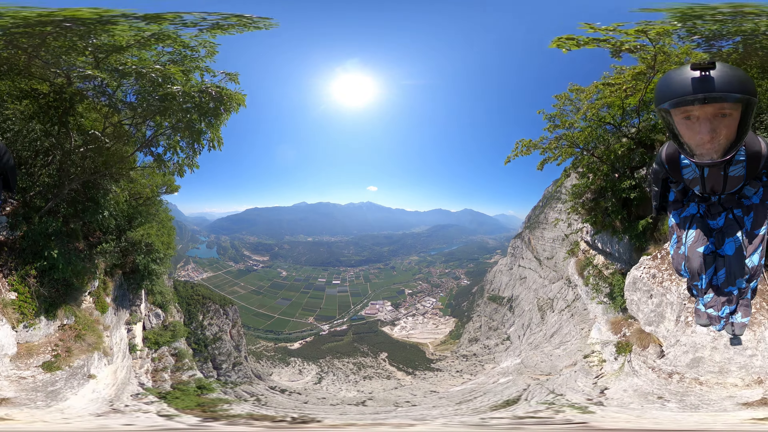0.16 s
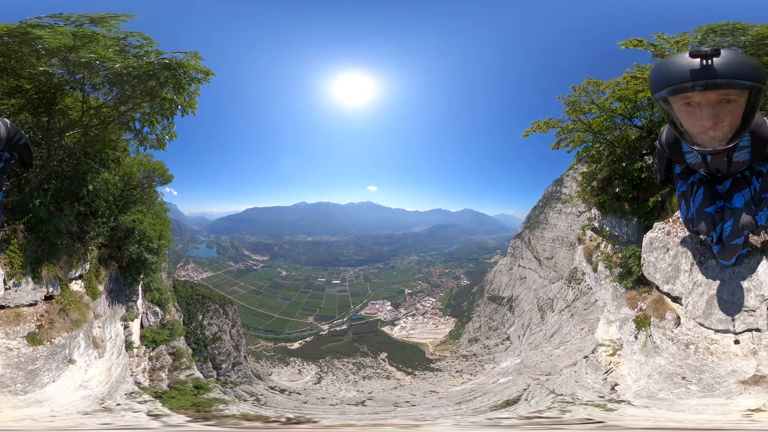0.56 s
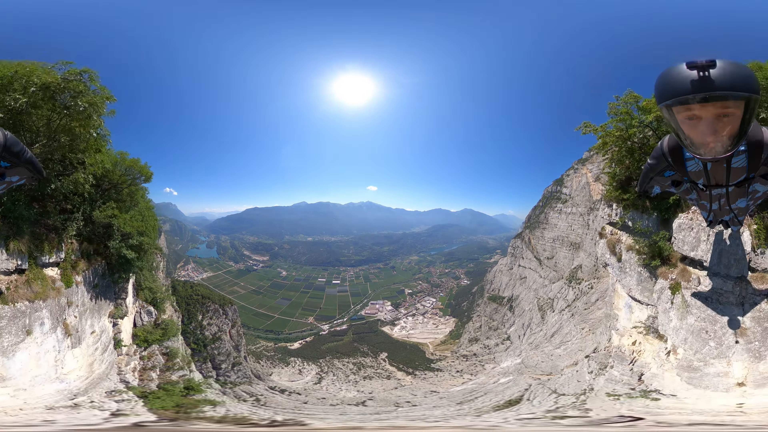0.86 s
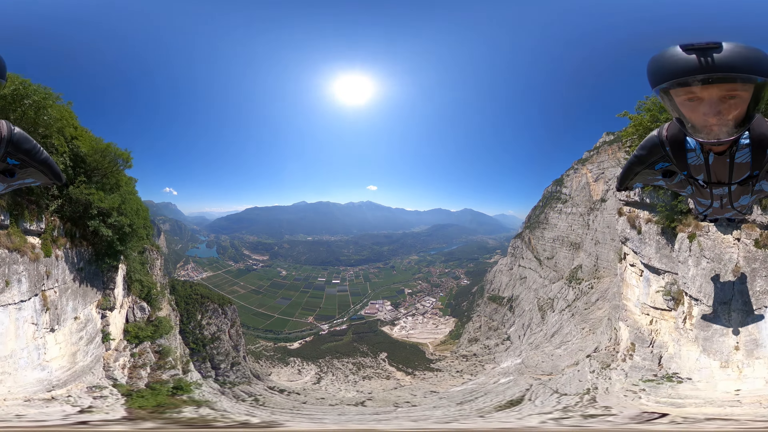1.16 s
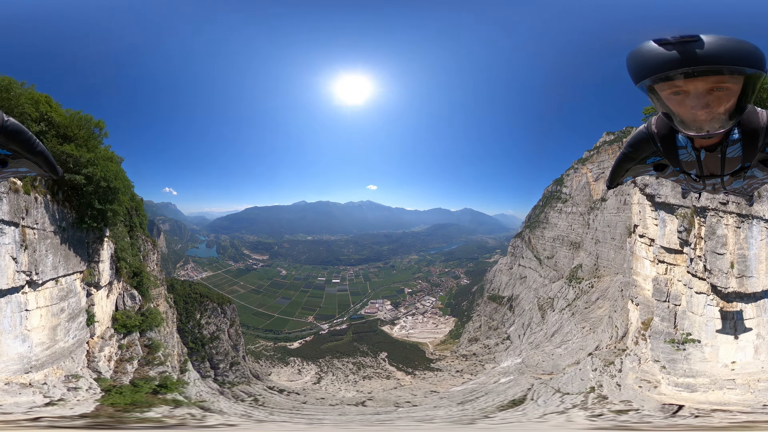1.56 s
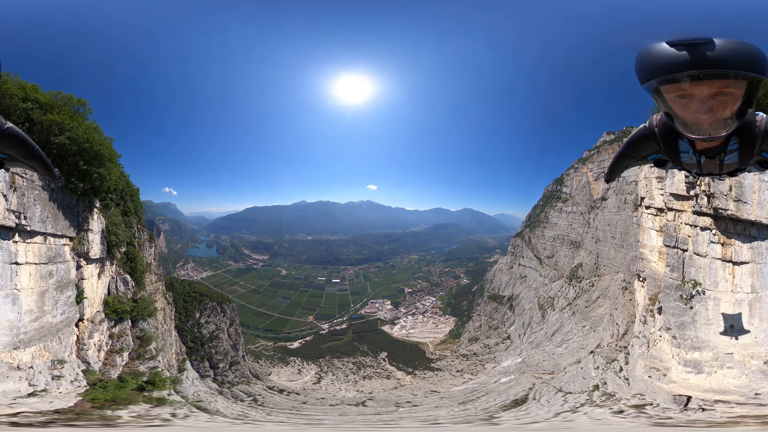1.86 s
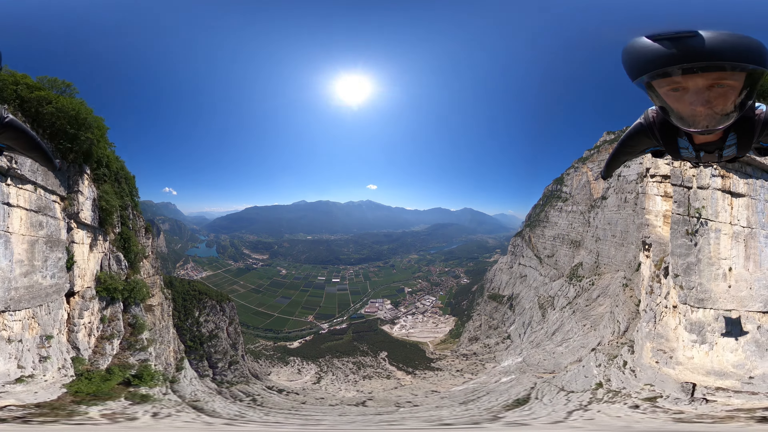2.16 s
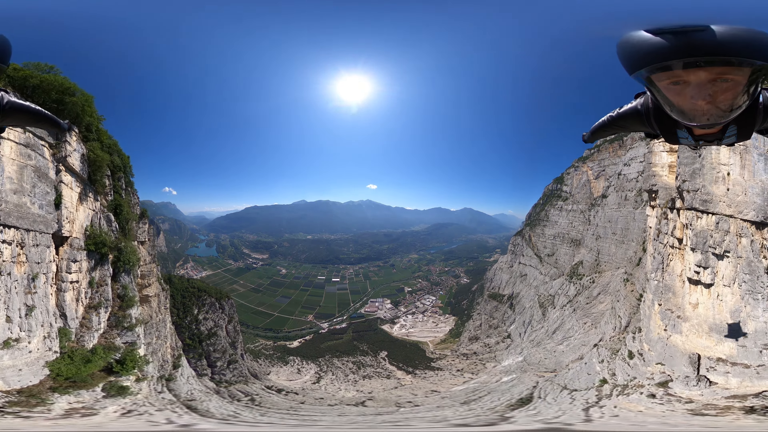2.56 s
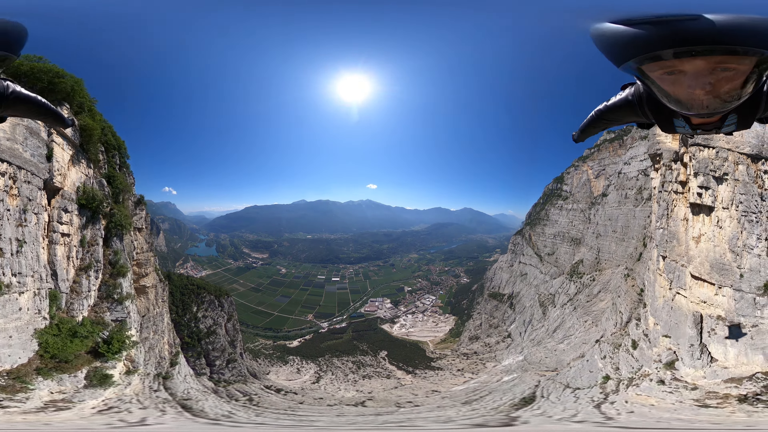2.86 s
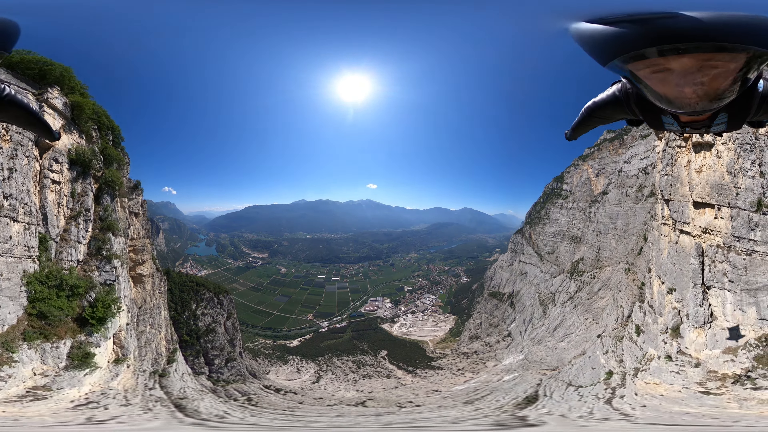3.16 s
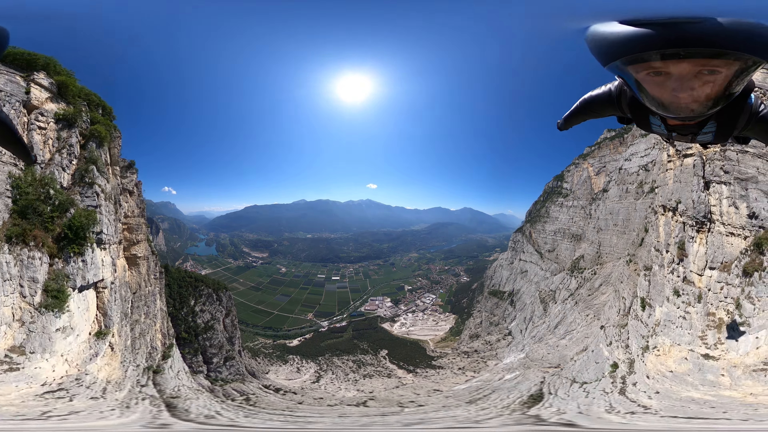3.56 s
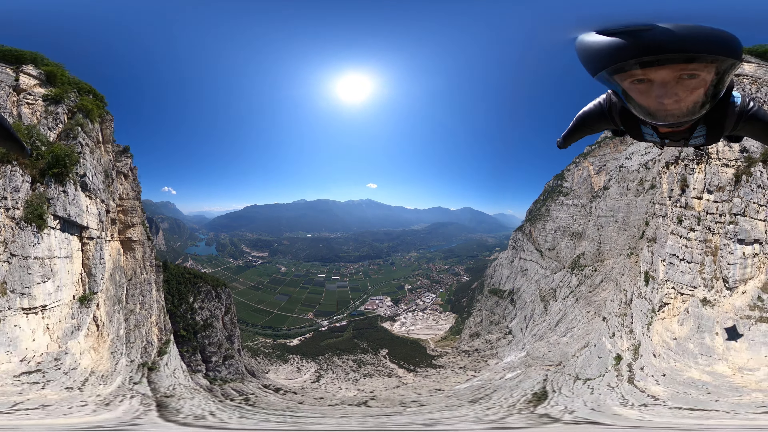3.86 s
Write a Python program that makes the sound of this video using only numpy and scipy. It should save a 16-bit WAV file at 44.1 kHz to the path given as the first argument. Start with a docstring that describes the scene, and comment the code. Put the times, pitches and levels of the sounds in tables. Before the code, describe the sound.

Wind rumble on a close, pole-mounted outdoor microphone, faint at first under rustling fabric, ticks and thumps, then surging after a short scrape into continuous low, uneven roar with growing hiss and scattered pops.

```python
"""Wind buffets a microphone on a pole as a jumper steps off a cliff: noise bands whose level and pitch grow unevenly
with the speed of the eddies, topped by single slaps of pressure and a rising broad hiss of air.
Before and around the launch, dense grains rustle as cloth, small snaps ring, the pole knocks (hard ticks
and soft thumps through its resonances), and grains through fixed peaks scrape along it with a thin squeak."""
import sys
import numpy as np
from scipy import signal
from scipy.io import wavfile

SR = 44100
rng = np.random.default_rng(int(sys.argv[2]) if len(sys.argv) > 2 else 0)


def materialize(psi):
    """Save the field psi as 16-bit PCM at rate SR to the path in sys.argv[1].

    A 1-D psi becomes a single channel; in a 2-D psi each row is a channel.
    """
    bounded = np.clip(np.atleast_2d(psi).T, -1, 1)
    quanta = np.round(bounded * 32767).astype(np.int16)
    wavfile.write(sys.argv[1], SR, quanta)


N = 176400  # length [samples]

# cloth dragged along the pole: (time [s], level [dB], brightness [dB per octave])
SCRAPE_CURVE = [(.84, -72, -9), (.87, -59.5, -4), (.9, -43, -16), (.915, -42.5, -6), (.93, -39, -2.5),
                (.942, -32.5, -1.5), (.955, -40, -2.5), (.97, -43, -3.5), (.987, -50, 3.5), (.995, -56, 0),
                (1.002, -39, -3.5), (1.012, -71, 3), (1.05, -70, -8)]
SILENT_DB = -120  # level of a curve outside its own span


def amp(db):
    """Gain of a dB value."""
    return 10 ** (np.asarray(db) / 20)


def rms_one(x):
    """Scale a sound to rms 1."""
    return x / np.sqrt(np.mean(x ** 2) + 1e-20)


def in_time(rows, before=None, after=None):
    """Draw each column of a curve with straight lines, one value per sample."""
    s, *columns = np.transpose(rows)
    return [np.interp(np.arange(N) / SR, s, column, before, after) for column in columns]


def at_hz(points, hz):
    """Read a spectrum on a log-frequency axis."""
    point_hz, point_db = np.transpose(points)
    return np.interp(np.log(hz), np.log(point_hz), point_db)


def low_pass(x, hz):
    """Fourth-order low-pass."""
    return signal.sosfilt(signal.butter(4, hz, fs=SR, output="sos"), x)


def drift(rate_hz):
    """Slow random movement of spread 1: noise through two equal poles, made at every 40th sample."""
    step, settle = 40, 2000  # samples; the first slow values are dropped
    r = np.exp(-2 * np.pi * rate_hz * step / SR)
    noise = rng.standard_normal(N // step + settle + 2)
    slow = signal.lfilter([1], [1, -2 * r, r * r], noise)[settle:]
    return np.interp(np.arange(N) / step, np.arange(len(slow)), rms_one(slow))


def ring(clicks, hz, t60):
    """Resonance: a unit click starts a sine of height 1 that falls 60 dB in t60 seconds."""
    r, w = amp(-60 / (t60 * SR)), 2 * np.pi * hz / SR
    return signal.lfilter([0, np.sin(w)], [1, -2 * r * np.cos(w), r * r], clicks + 1e-18)


def t60_of_width(width_hz):
    """Decay time of a resonance of the given bandwidth: the narrower, the longer."""
    return np.log(1000) / np.pi / width_hz


def narrow(x, hz, width_hz):
    """Pass a sound twice through one resonance; rms 1."""
    t60 = t60_of_width(width_hz)
    return rms_one(ring(ring(x, hz, t60), hz, t60))


def clicks_at(s, db):
    """Single-sample clicks of given level at given times."""
    out = np.zeros(N)
    out[(np.asarray(s) * SR).astype(int)] = amp(db)
    return out


def grains(per_s, spread_db):
    """Random clicks of uneven size and either sign; rms 1."""
    size_db = spread_db * np.minimum(rng.exponential(1, N), 5)
    sizes = amp(size_db) * rng.choice([-1, 1], N)
    return rms_one(sizes * (rng.random(N) < per_s / SR))


def bank(sources, low_hz, high_hz, gain_db, order=3):
    """Third-octave bands, neighbours on unrelated sources, over the rms expected of the steady gains.

    gain_db(hz) gives a steady gain, levelled out overall, and a moving one that stays audible."""
    edges = low_hz * 2 ** np.arange(0, np.log2(high_hz / low_hz), 1 / 3)
    out, power = 0, 0
    for k, (low, high) in enumerate(zip(edges, edges[1:])):
        band_filter = signal.butter(order, [low, high], "band", fs=SR, output="sos")
        band = signal.sosfilt(band_filter, sources[k % 2])
        steady_db, moving_db = gain_db(np.sqrt(low * high))
        out = out + amp(steady_db + moving_db) * band
        power = power + amp(2 * steady_db) * (high - low) * 2.2 / SR
    return out / np.sqrt(power)


def buffeting():
    """Eddies sweep past the microphone: their speed slides a noise spectrum up, gusts swell and brighten it."""
    # course of the wind: (time [s], level [dB], relative eddy speed)
    wind_curve = [(0, -38, 0.21), (.3, -53, 0.26), (.4, -48.5, 0.4), (.52, -52, 0.14), (.56, -30.5, 0.12),
                  (.6, -32, 0.33), (.7, -36.5, 0.44), (.78, -38, 0.14), (.85, -38.5, 0.21),
                  (.93, -19, 0.16), (1, -21.5, 0.1), (1.05, -33.5, 0.56), (1.12, -30, 0.24),
                  (1.18, -37, 0.32), (1.24, -32, 0.39), (1.3, -18, 0.32), (1.4, -22.5, 0.35),
                  (1.57, -16, 0.47), (1.7, -17, 0.53), (1.85, -16.5, 0.56), (2.08, -16, 0.59),
                  (2.175, -20.5, 0.64), (2.22, -16.5, 0.59), (2.4, -15.5, 0.68), (2.58, -15.5, 0.73),
                  (2.7, -15.5, 0.8), (2.85, -16.5, 0.77), (3.05, -13.5, 0.8), (3.26, -16.5, 0.82),
                  (3.42, -14.5, 0.88), (3.65, -16.5, 0.86), (3.88, -13.5, 0.94), (4, -17, 0.92)]
    # eddy spectrum at speed 1: (frequency [Hz], level [dB per Hz])
    eddy_spectrum = [(12, -15.5), (30, -6.5), (70, -0.5), (150, -4), (250, -7.5), (330, -11.5),
                     (430, -18.5), (560, -22.5), (750, -30.5), (1100, -44.5), (2500, -80), (9000, -130)]
    # gusts and lulls that briefly change the eddy speed: (time [s], share of speed gained, length [s])
    speed_gusts = [(1.306, 0.087, 0.025), (1.613, 0.17, 0.05), (1.792, 0.21, 0.036), (2.024, 0.13, 0.034),
                   (2.102, 0.29, 0.024), (2.175, -0.35, 0.018), (2.233, 0.13, 0.046), (2.67, -0.092, .04),
                   (2.885, -0.15, 0.025), (3.134, -0.21, .02), (2.407, 0.23, 0.07), (2.522, 0.26, 0.019),
                   (2.606, .2, .05), (2.754, 0.27, 0.06), (2.832, 0.25, 0.044), (2.928, 0.25, 0.016),
                   (2.999, 0.14, 0.027), (3.042, 0.13, .05), (3.09, .15, 0.043), (3.192, 0.19, 0.048),
                   (3.293, 0.14, 0.022), (3.402, 0.28, 0.074), (3.493, .15, 0.02), (3.595, 0.35, 0.045),
                   (3.762, 0.063, .04), (3.87, 0.091, 0.028), (3.903, 0.26, 0.033), (3.958, 0.048, 0.024)]
    gust_db, gust_hz = 0.46, 6.7  # level swing shared by all bands
    lump_db, lump_hz = 2.0, 25.4  # level swing of each band on its own
    full_swing_hz = 148           # lower bands swing less
    gust_wobble, quick_wobble, wobble_hz = 0.0108, 0.06, 22  # unrest of the log of eddy speed
    skew = .07                    # pressure peaks are sharper than troughs

    level_db, speed = in_time(wind_curve)
    gust, quick = drift(gust_hz), drift(wobble_hz)
    t = np.arange(N) / SR
    rush = 1
    for s, share, length_s in speed_gusts:
        rush = rush + share * np.exp(-2 * ((t - s) / length_s) ** 2)
    speed = np.clip(speed * rush, .05, 2)
    speed = speed * np.exp(gust_wobble * gust + quick_wobble * quick)

    def eddy_gain(hz):
        swing_db = gust_db * gust + lump_db * drift(lump_hz)
        return at_hz(eddy_spectrum, hz / speed), min(hz / full_swing_hz, 1) * swing_db

    flow = bank(rng.standard_normal((2, N)), 11.86, 2000, eddy_gain)
    return amp(level_db) * (flow + skew * (flow ** 2 - 1))


def rustle():
    """Moving cloth: dense fine grains, coloured in bands that flicker independently."""
    # course of the cloth: (time [s], level [dB], brightness [dB per octave])
    cloth_curve = [(0, -56.5, -2), (.1, -58, -1.5), (.19, -56.5, -0.5), (.27, -55, -1), (.33, -51.5, -1),
                   (.4, -52.5, -0.5), (.5, -49, -1), (.56, -50, -1.5), (.62, -51.5, -0.5), (.7, -54, -0.5),
                   (.8, -52, 0), (.87, -45.5, -1), (.94, -34, -3.5), (1.02, -49, -0.5), (1.06, -49, -1),
                   (1.12, -51.5, 0), (1.2, -52, -1.5), (1.24, -61, 0.5), (1.35, -68, 2), (1.5, -84.5, 0)]
    # cloth spectrum: (frequency [Hz], level [dB per Hz])
    cloth_spectrum = [(100, 2), (200, 0), (450, -2.5), (800, -6), (1300, -6.5), (2400, -13.5), (3500, -18),
                      (6600, -28.5), (9000, -37), (11000, -43), (13000, -46), (16000, -62)]
    grains_per_s, spread_db = 4900, 3
    patch_db, patch_hz = 1.2, 23  # flicker of each band

    level_db, tilt = in_time(cloth_curve, after=SILENT_DB)
    tilt = np.clip(tilt, -9, 9)
    cloth = [grains(grains_per_s, spread_db) for _ in range(2)]

    def cloth_gain(hz):
        steady_db = at_hz(cloth_spectrum, hz) + tilt * np.log2(hz / 1500)
        return steady_db, patch_db * drift(patch_hz)

    return amp(level_db) * bank(cloth, 111.7, 17000, cloth_gain)


def snaps():
    """Small snaps of buckles and cloth, plus one knock on the pole at 0.938 s that rings longest: each click
    rings one short resonance."""
    # snaps: (time [s], level [dB], pitch [Hz], 60 dB decay [s])
    snap_list = [(0.175, -44, 1670, .006), (0.174, -53, 4500, .002), (.331, -47, 1210, 0.016),
                 (.332, -60, 5800, .006), (.4315, -47, 2500, .006), (0.474, -40, 1510, 0.014),
                 (0.505, -43, 2000, .008), (.543, -50, 2600, .01), (0.901, -39, 3500, .005),
                 (0.913, -31, 2350, 0.0054), (0.938, -25.5, 1776, 0.033), (.941, -34, 4200, .003),
                 (.964, -41, 2500, .003), (.987, -38, 6150, .006), (.997, -37, 1900, 0.013),
                 (1.001, -37, 3340, 0.003), (1.164, -36, 1220, 0.018)]
    rung = sum(ring(clicks_at([s], db), hz, ring_s) for s, db, hz, ring_s in snap_list)
    return low_pass(rung, 10500)


def ticks():
    """Hard contacts on the pole: clicks excite its high modes, most strongly near a centre pitch."""
    # contacts: (time [s], level [dB], centre of the modes struck [Hz])
    contacts = [(.7202, -35.5, 2280), (.722, -44, 1500), (0.8047, -37, 2190), (0.806, -31, 1340),
                (.856, -46, 1490), (.925, -46, 1800)]
    # high modes of the pole: (frequency [Hz], level [dB], 60 dB decay [s])
    high_modes = [(690, -23, .03), (855, -18, .03), (1060, 4.5, 0.031), (1480, 2.5, 0.018),
                  (1700, -2.5, 0.016), (2260, -1, 0.016), (2750, -10, 0.014), (3150, -10, .01),
                  (4600, -11, .005), (6100, 5, .008)]
    reach_octaves = 0.83  # modes this far from the centre are 9 dB down
    strike_spread_db = 1  # change of colour from contact to contact

    s, tick_db, centre_hz = np.transpose(contacts)
    spread = strike_spread_db * rng.standard_normal((len(s), len(high_modes)))
    out = 0
    for k, (hz, db, t60) in enumerate(high_modes):
        off_centre_db = 9 * (np.log2(hz / centre_hz) / reach_octaves) ** 2
        struck_db = tick_db + db + spread[:, k] - np.minimum(off_centre_db, 22)
        out = out + (-1) ** k * ring(clicks_at(s, struck_db), hz, t60)
    return low_pass(out, 7000)


def thumps():
    """Soft pushes ring the low modes of the pole, which the scrape also shakes with noise."""
    # knocks: (time [s], level [dB], hardness [dB per octave])
    knock_list = [(0.72, -21.5, -1), (0.8043, -11, 0), (0.855, -30.5, 0), (0.902, -25.5, -3),
                  (0.9246, -12, -8), (0.938, -26, 12), (1.012, -23, -13)]
    # low modes of the pole: (frequency [Hz], level [dB], 60 dB decay [s])
    low_modes = [(186.3, -1.5, 0.13), (258, -18.5, 0.047), (289, 1, 0.023), (385, -5.5, 0.02)]
    # band that the mount passes on: low and high edge [Hz]
    mount_band = [90, 480]
    lag_s, soft_s = 0.00334, .001       # delay after the listed time; softness of the push
    counter_db, lead_s = -4.5, 0.0018   # a weaker opposite push comes just before each thump
    shake_db = -19.5                    # noise relative to the scrape curve

    s, thump_db, hard = np.transpose(knock_list)
    soft = np.hanning(int(2 * soft_s * SR) + 3)
    soft = soft / soft.sum()
    scrape_db, _ = in_time(SCRAPE_CURVE, before=SILENT_DB, after=SILENT_DB)
    shake = amp(shake_db + scrape_db) * rng.standard_normal(N)
    out = 0
    for hz, db, t60 in low_modes:
        push_db = thump_db + hard * np.log2(hz / low_modes[0][0])
        push = clicks_at(s + lag_s, push_db)
        push = push - clicks_at(s + lag_s - lead_s, push_db + counter_db)
        out = out + amp(db) * ring(np.convolve(push + shake, soft)[:N], hz, t60)
    return signal.sosfilt(signal.butter(2, mount_band, "band", fs=SR, output="sos"), out)


def scrape(grit):
    """Cloth dragged along the pole: gritty grains pass through parallel resonances of alternating sign."""
    # resonances: (frequency [Hz], width [Hz], level [dB])
    scrape_peaks = [(720, 280, -4.5), (1120, 290, -5), (1800, 500, -3), (2720, 1100, -7.5), (3900, 890, -8),
                    (5100, 1600, -12), (6360, 520, -9.5), (8150, 570, -24.5)]
    level_db, tilt = in_time(SCRAPE_CURVE, before=SILENT_DB, after=SILENT_DB)
    tilt = np.clip(tilt, -9, 9)
    out = 0
    for k, (hz, width_hz, db) in enumerate(scrape_peaks):
        peak = rms_one(ring(grit, hz, t60_of_width(width_hz)))
        out = out + (-1) ** k * amp(level_db + db + tilt * np.log2(hz / 1500)) * peak
    return low_pass(out, 10500)


def squeak(grit):
    """Thin top of the scrape: the same grains in a high band, sharpening to a narrow whistle."""
    # course of the squeak: (time [s], level [dB], whistle over squeak [dB])
    squeak_curve = [(0.86, -85, -12), (0.884, -102, -12), (0.904, -74, -10), (0.912, -84, -12),
                    (0.932, -79, -12), (0.96, -80, -6), (0.978, -72, 4), (0.99, -82, 6), (1.002, -84, 6),
                    (1.015, -100, 0), (1.03, -108, 0)]
    squeak_db, whistle_db = in_time(squeak_curve, before=SILENT_DB, after=SILENT_DB)
    broad = narrow(grit, hz=12500, width_hz=2000)
    whistle = narrow(grit, hz=13800, width_hz=400)
    return amp(squeak_db) * (broad + amp(whistle_db) * whistle)


def hiss():
    """Air rushing past helmet and suit: smooth noise bands whose spectrum stretches and tilts."""
    # course of the air: (time [s], level [dB], brightness [dB per octave], stretch of the spectrum)
    air_curve = [(1.1, -89, 1, 0.55), (1.22, -69, -6, .7), (1.3, -58.5, -6, 0.72), (1.42, -56.5, -5, 0.73),
                 (1.53, -54, -4.5, 0.92), (1.71, -52, -2.5, 1), (1.82, -55, -4, 0.8), (2.1, -49, -6, 0.88),
                 (2.31, -49.5, -5, 0.91), (2.44, -45.5, -5.5, 0.91), (2.6, -45.5, -4, 0.92),
                 (2.76, -45.5, -3, 0.88), (2.91, -43.5, -1.5, 0.83), (3.04, -44, -1.5, 0.83),
                 (3.4, -40.5, -1, 0.85), (3.7, -39, -1, 0.96), (3.92, -37, -1.5, 1.0), (4, -36, -3, 1.0)]
    # air spectrum: (frequency [Hz], level [dB per Hz])
    air_spectrum = [(250, -19.5), (600, -5), (1000, -4.5), (1800, -5.5), (3000, -6.5), (5400, -9),
                    (7000, -15), (8200, -16.5), (9300, -39.5), (11500, -34.5), (13000, -52), (14500, -61.5),
                    (20000, -76)]
    shared_db, shared_hz = 0.35, 6.3  # flicker of all bands together
    band_db, band_hz = 0.77, 25       # flicker of each band on its own

    level_db, tilt, stretch = in_time(air_curve)
    stretch = np.clip(stretch, .3, 2)
    shared = drift(shared_hz)

    def air_gain(hz):
        steady_db = at_hz(air_spectrum, hz / stretch) + tilt * np.log2(hz / 2000)
        return steady_db, shared_db * shared + band_db * drift(band_hz)

    return amp(level_db) * bank(rng.standard_normal((2, N)), 245.7, 17000, air_gain, order=2)


def slaps():
    """Sharp eddies slap the microphone port: each a narrow pressure peak between two shallow troughs."""
    # slaps: (time [s], level of the brightest part [dB], length [s])
    slap_list = [(2.105, -39, 0.0016), (2.417, -20, 0.003), (2.523, -18, 0.0023), (2.544, -30, 0.0054),
                 (2.58, -21, 0.0021), (2.588, -22, 0.00163), (2.591, -15, 0.0037), (2.981, -22.5, 0.0021),
                 (3, -27, 0.0026), (3.43, -24, 0.0017), (3.499, -17, 0.00333), (3.655, -33, 0.0021),
                 (3.852, -15, 0.0024), (3.889, -17.5, 0.0028), (3.961, -24, 0.002)]
    whole_over_bright_db = 4.5  # whole pulse over its brightest part
    t = np.arange(N) / SR
    out = 0
    for s, db, length_s in slap_list:
        u = (t - s - length_s) / (length_s / 4)  # the peak comes one length after the listed time
        out = out + amp(db + whole_over_bright_db) * (1 - u ** 2) * np.exp(-u ** 2 / 2)
    return out


def scene():
    """Sum all sources at one microphone; scrape and squeak share their grains."""
    grit = grains(per_s=2500, spread_db=2.5)
    wind = buffeting() + hiss() + slaps()
    handling = rustle() + snaps() + ticks() + thumps() + scrape(grit) + squeak(grit)
    return (wind + handling)[None]


def record(dry):
    """Round peaks off firmly, cut the top steeply and fade the last few milliseconds."""
    limit, cutoff_hz, fade_s = .6, 14250, .003  # limit in full scale
    rounded = dry / (1 + (dry / limit) ** 4) ** .25
    top_cut = signal.ellip(12, .5, 70, cutoff_hz, fs=SR, output="sos")
    left_s = np.arange(N)[::-1] / SR
    fade = np.sin(np.pi / 2 * np.clip(left_s / fade_s, 0, 1)) ** 2
    return fade * signal.sosfilt(top_cut, rounded)


dry = scene()
out = record(dry)
materialize(out)
```